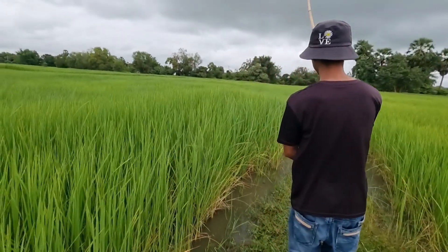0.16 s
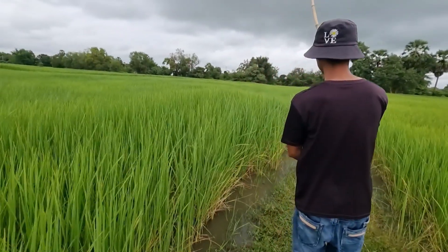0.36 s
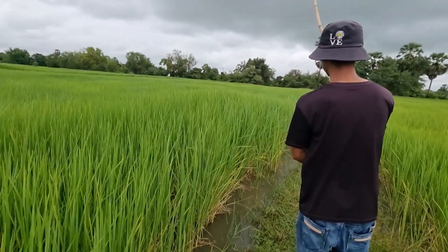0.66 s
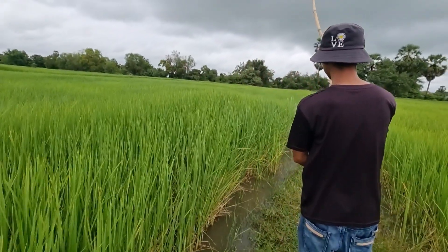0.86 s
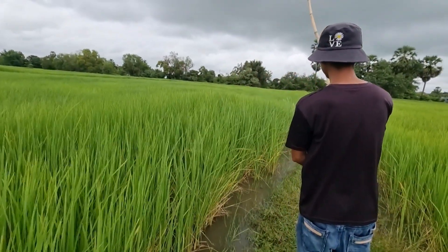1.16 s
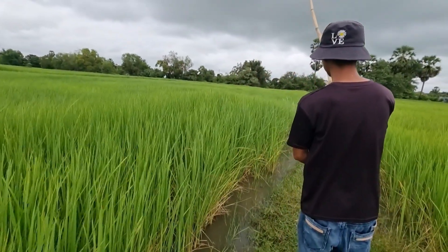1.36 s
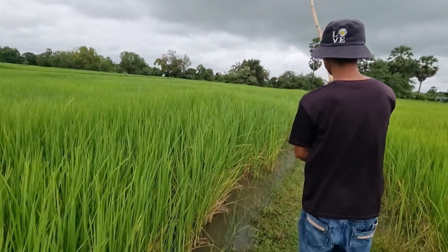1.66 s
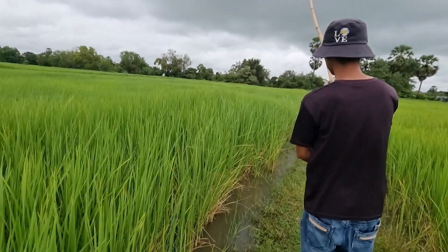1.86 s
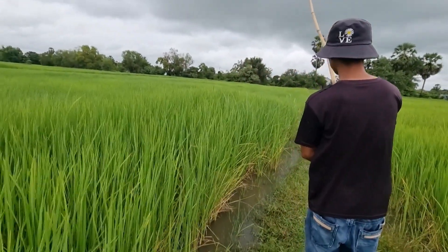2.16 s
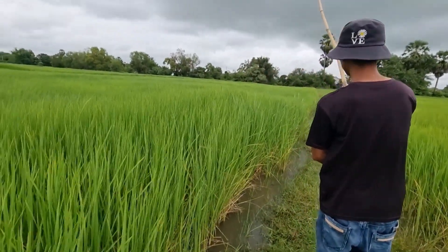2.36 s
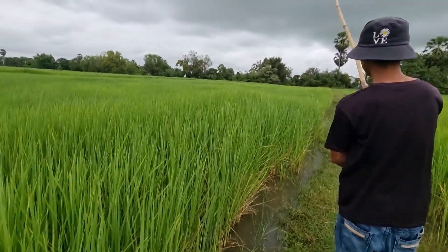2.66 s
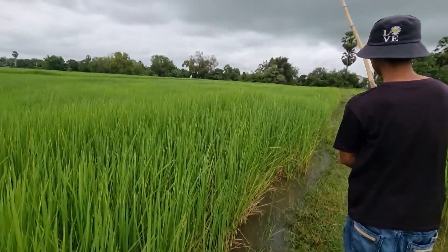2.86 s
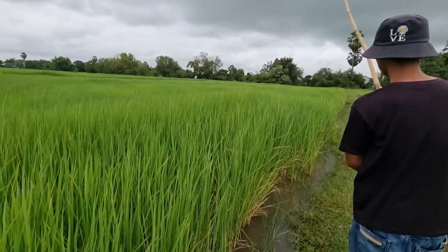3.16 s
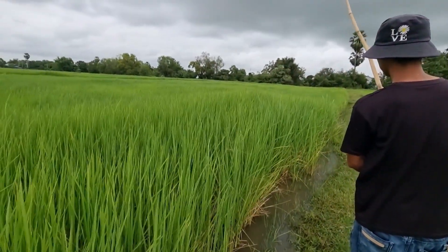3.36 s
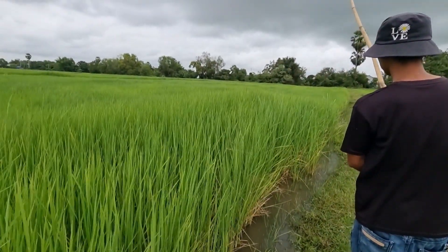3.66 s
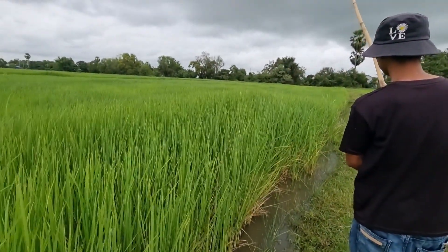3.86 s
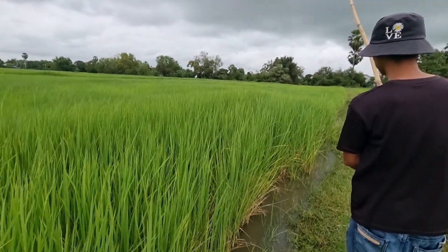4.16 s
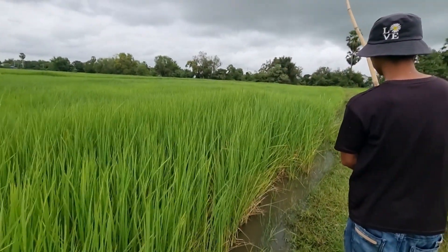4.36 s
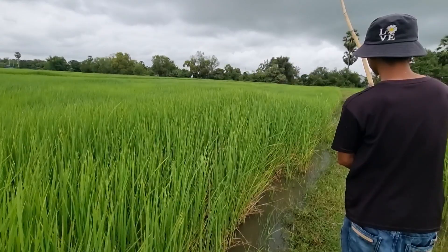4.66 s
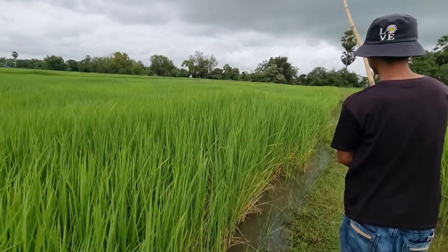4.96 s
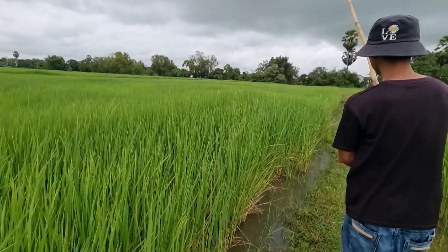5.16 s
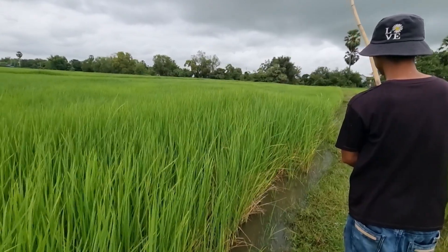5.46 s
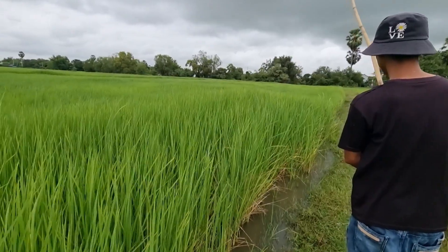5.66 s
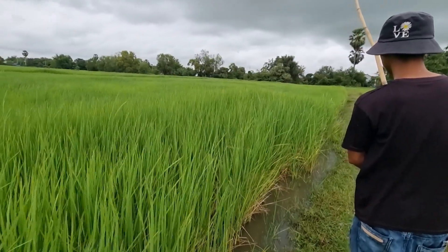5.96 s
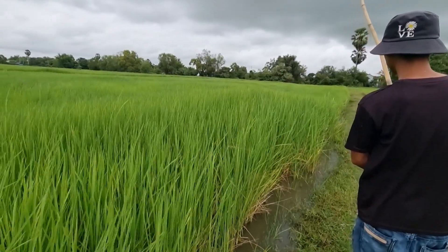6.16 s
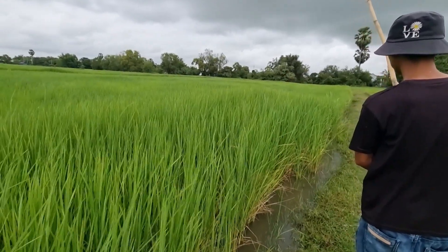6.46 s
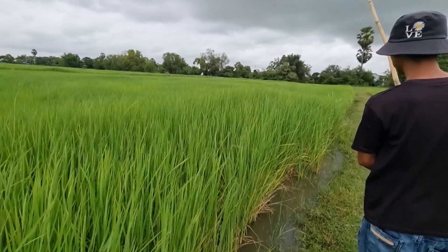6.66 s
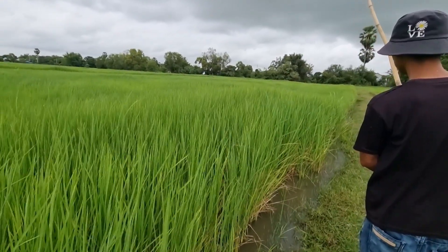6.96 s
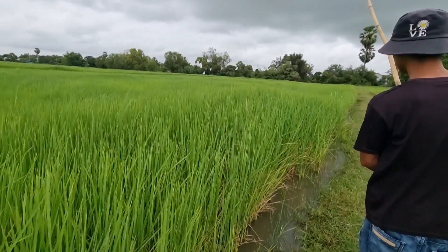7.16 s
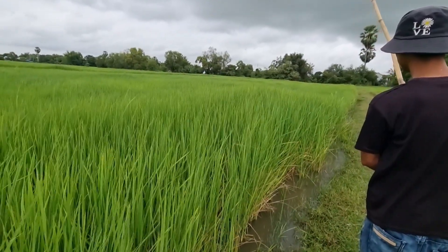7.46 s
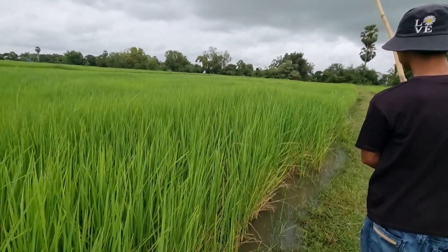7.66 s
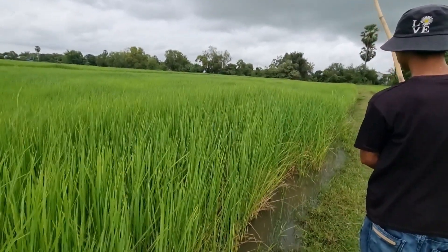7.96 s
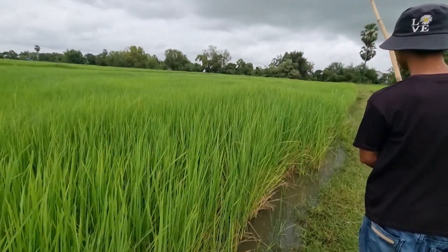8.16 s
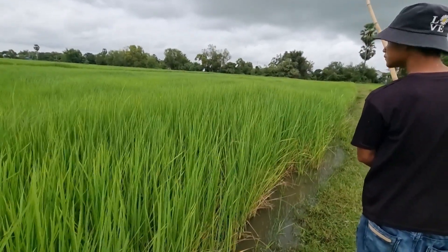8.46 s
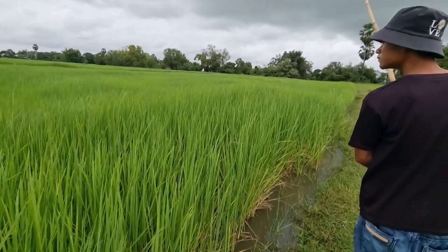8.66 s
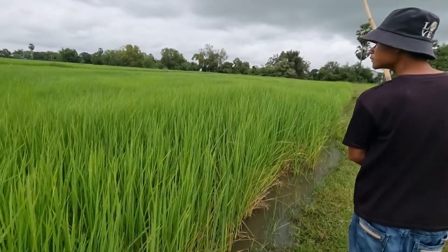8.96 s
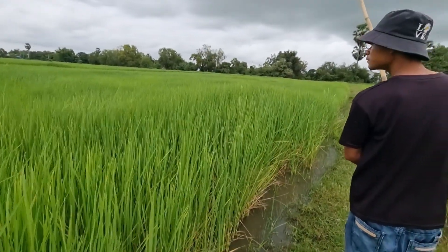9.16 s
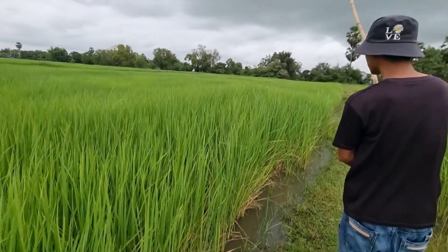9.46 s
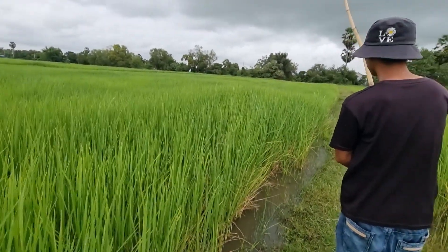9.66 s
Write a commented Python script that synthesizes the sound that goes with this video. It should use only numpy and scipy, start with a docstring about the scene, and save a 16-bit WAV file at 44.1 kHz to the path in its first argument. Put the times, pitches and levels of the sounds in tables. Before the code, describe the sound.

Gusty wind rumbles and thumps on the microphone in an open field, with faint bird peeps, whistles and high insect chirping.

```python
"""Wind over a rice field

A low roar reaches both microphone ports, gusts buffet and thump each on its own, and blades rustle.
Katydids chirp with ringing wing strokes, a near one and then a fainter, farther one, above a far insect
chorus and a throbbing cricket. Small birds peep and whistle, and a frog croaks once through its resonant
throat. Faint calls, a rooster-like crow and an engine-like hum drift in from far away."""
import sys
import numpy as np
from scipy import signal
from scipy.fft import rfft, irfft, next_fast_len
from scipy.io import wavfile

SR = 44100
rng = np.random.default_rng(int(sys.argv[2]) if len(sys.argv) > 2 else 0)


def log_audio(samples):
    """Write samples as a 16-bit WAV file to the path given in sys.argv[1]."""
    # one column per channel
    frames = np.atleast_2d(samples).T
    # limit to full scale, then quantise
    limited = np.clip(frames, -1, 1)
    pcm = np.round(limited * 32767).astype(np.int16)
    wavfile.write(sys.argv[1], SR, pcm)


N = 433503

# the wind bed under the thumps: time_s, level_db
WIND_LEVEL = [(0.0, -47.5), (0.38, -43.5), (1.15, -47.5), (1.61, -44), (2.3, -47), (2.76, -46.5),
              (3.01, -48), (6.46, -49), (6.81, -48.5), (7.01, -50.5), (7.45, -46), (7.94, -51),
              (8.38, -46.5), (8.9, -49.5), (9.39, -47.5), (9.83, -48.5)]
# eddies bursting on a port: time_s, level_db, pan_db (left minus right), width_ms, relative_snap_db
THUMPS = [(0.263, -29.5, -9, 3.4, -35), (0.811, -28.5, -12, 1.56, -19), (0.845, -32, -17.5, 1.33, -11.5),
          (0.97, -45, 6, 1.8, -2), (1.003, -40.5, -21, 1.6, -1.5), (1.188, -24.5, -9.5, 2.8, -11),
          (1.228, -42.5, -20, 1.86, 4), (1.264, -28.5, -10.5, 3, -11), (1.384, -27, -5.5, 2.1, -22),
          (1.483, -25, -12.5, 1.62, -31), (1.573, -26.5, -11.5, 1.34, -25), (1.648, -37.5, -14, 2.3, -5),
          (1.781, -31, -1, 3.2, -22), (4.345, -36.5, -13, 1.9, -44), (4.763, -28, -10, 1.9, -27),
          (4.82, -33.5, -15, 1.28, -17), (6.584, -39, -9, 3.3, 9), (6.631, -29, 4, 2.9, -28),
          (6.708, -25.5, -13.5, 2.8, -16), (6.734, -32, -11, 2.2, -10), (6.828, -28.5, 4, 2.4, -10),
          (6.851, -26, -8.5, 2, -14), (6.978, -30.5, 2.5, 3.3, -23), (7.191, -32, -16.5, 1.66, -19),
          (7.29, -38.5, 21, 1.65, -27), (7.363, -37.5, 18, 1.9, -22), (8.155, -32.5, -5, 1.8, -35)]
# tone of the distant roar: frequency_hz, gain_db
ROAR_SPECTRUM = [(13, -37), (22, -14), (35, -23), (48, 0), (64, 0.5), (96, -5), (134, -3), (182, -11.5),
                 (221, -15), (258, -22.5), (480, -44), (620, -48), (1060, -120)]
# tone of the buffeting on the ports: frequency_hz, gain_db
BUFFET_SPECTRUM = [(13, -50), (22, -5), (64, 3.5), (118, -2.5), (203, -12), (255, -21), (300, -27),
                   (450, -45), (580, -68), (990, -120)]
# tone of rustling blades and far hiss: frequency_hz, gain_db
RUSTLE_SPECTRUM = [(250, -80), (380, -16), (480, -9.5), (700, 0), (910, -1), (2000, -8), (3300, -3),
                   (4300, -1.5), (5000, -7.5), (5800, -11.5), (7000, -8.5), (8200, -11), (10500, -11),
                   (14500, -11.5), (15400, -14)]
# rise and fall of the rustle: time_s, level_db
RUSTLE_LEVEL = [(0.0, -65), (1.04, -67.5), (3.7, -69), (5.34, -67.5), (8.16, -67.5), (8.38, -65.5),
                (9.25, -69), (9.83, -68)]
# lean of the rustle: frequency_hz, pan_db
RUSTLE_PAN = [(400, 10.5), (1000, -0.5), (3000, 6.5), (12000, 5.5)]
# rustle common to both ports: frequency_hz, power_share
RUSTLE_COMMON = [(400, 1), (1200, 0.22), (3000, 0.042), (12000, 0.0099)]
# dry ticks of blades: start_s, level_db
BLADE_TICKS = [(0.4524, -50), (4.2423, -55), (4.6144, -67), (5.8494, -66), (6.4794, -55)]
# katydid chirping, a near one until 6.7 s, then a fainter, farther one:
# time_s, level_db, strokes_per_s, behind_beat_s
KATYDID_CHIRPING = [(0, -82.5, 142, -0.035), (.84, -79.5, 143, -0.033), (1.96, -73.5, 141, -0.053),
                    (3.08, -69, 141, -0.084), (4.76, -69, 137, -0.08), (5.32, -68, 135, -0.094),
                    (5.88, -68, 133, -0.074), (6.44, -67.5, 135, -0.065), (6.71, -73.5, 135, -0.025),
                    (6.74, -82.5, 135, -0.049), (7.6, -80, 136, -0.11), (8.4, -77, 138, -0.085),
                    (9.83, -76.5, 142, -0.093)]
# falling peeps: start_s, length_s, end_hz, level_db
PEEPS = [(0.026, 0.041, 4250, -58.5), (0.323, 0.052, 4610, -57.5), (0.58, 0.077, 4620, -57),
         (0.832, 0.054, 4740, -60.5), (1.103, 0.061, 4660, -60.5), (1.385, 0.043, 4650, -60.5),
         (1.663, 0.031, 4620, -62.5), (1.894, 0.059, 4550, -64), (2.124, 0.066, 4510, -64),
         (2.351, 0.048, 4500, -63), (2.601, 0.042, 4540, -61), (2.839, 0.046, 4300, -61),
         (3.053, 0.059, 4550, -66.5), (4.791, 0.051, 4700, -62), (5.018, 0.043, 4700, -72)]
# quick faint chips: start_s, length_s, start_hz, end_hz, start_db
CHIPS = [(2.98, .025, 3750, 3200, -77), (3.475, 0.03, 4770, 3230, -76), (4.398, 0.016, 5160, 4520, -78),
         (4.612, 0.015, 5340, 3160, -73), (5.84, 0.028, 3700, 2350, -83), (8.12, 0.019, 4130, 5000, -77),
         (8.15, 0.037, 4280, 3300, -81), (8.45, 0.029, 2460, 2250, -85), (8.61, 0.027, 2530, 2270, -81.5),
         (8.292, 0.013, 5260, 4340, -71.5), (9.448, 0.017, 4260, 5040, -73), (9.475, 0.04, 4830, 2940, -80)]
# high rising whistles: start_s, length_s, top_hz, level_db
HIGH_WHISTLES = [(3.672, 0.13, 7210, -54.5), (6.379, 0.14, 7180, -60.5), (8.982, 0.13, 7290, -52.5)]
# contour of a high whistle: length_share, pitch_share, gain_db
HIGH_SHAPE = [(0, .84, -17), (.14, .895, 1), (.27, .92, 1), (.5, 0.94, -0.5), (.68, .98, -2.5), (.88, 1, 2),
              (1, 1, -6)]
# lower whistles, a hook then a held note: start_s, length_s, top_hz, hook_db, held_db
LOW_WHISTLES = [(2.281, 0.13, 6030, -72, -58.5), (5.188, 0.15, 6060, -62, -57),
                (7.675, 0.14, 6030, -60.5, -56)]
# contour of a lower whistle: length_share, pitch_share, gain_db, in_hook (1 or 0)
LOW_SHAPE = [(0, .86, -12, 1), (.14, .82, 0, 1), (.27, .925, -3, 1), (.37, .95, -17, 1), (.5, .97, -10, 0),
             (.66, .99, -3, 0), (.8, 1, 0, 0), (.9, .99, -4, 0), (1, .98, -22, 0)]
# the frog's throat pulses: time_s, pulses_per_s
CROAK_RATE = [(3.51, 138.8), (3.6, 133.8), (3.68, 137.3), (3.78, 134.4), (3.85, 135.4), (3.96, 134)]
# far hum: time_s, level_db
HUM_LEVEL = [(0, -66.5), (2, -55.5), (4.5, -51), (6, -59), (8, -58.5), (9, -55.5), (9.83, -48.5)]
# main band of the insect chorus: time_s, level_db
CHORUS_LEVEL = [(0.0, -79), (2.14, -80), (3.56, -77.5), (4.5, -79.5), (6.43, -75.5), (7.34, -80),
                (9.83, -77.5)]
# a cricket's short spell: time_s, level_db
CRICKET_LEVEL = [(5.5, -85), (5.75, -79), (6.3, -75), (6.7, -83), (7.0, -96)]
# far soft calls: start_s, length_s, start_hz, end_hz, start_db
FAR_CALLS = [(.61, 0.06, 6020, 6070, -75), (5.53, 0.056, 6400, 6430, -79),
             (7.485, 0.071, 6280, 6450, -82.5), (1.22, 0.094, 2126, 2140, -78),
             (7.25, .085, 4070, 4050, -80), (1.62, 0.046, 1230, 1145, -77.5),
             (1.66, 0.31, 2090, 1910, -84.5), (2.23, 0.078, 1750, 1770, -85), (5.8, 0.17, 880, 870, -88),
             (7.05, 0.18, 713, 694, -84), (7.45, 0.28, 890, 845, -86)]
# a far rooster-like crow that droops at its end: time_s, pitch_hz, level_db
CROW = [(5.8, 1467, -88), (6.1, 1452, -79.5), (6.4, 1440, -90), (6.52, 1405, -75), (6.6, 1350, -82)]
# a faint band of noise that comes and goes: time_s, level_db
DRONE_LEVEL = [(0, -83), (4.8, -90), (5.3, -80), (6.5, -81.5), (7.2, -74), (8.5, -88), (9, -87),
               (9.83, -82)]

# how late the left port hears each source
LAG_SAMPLES = dict(wind=17, katydid=-9, chorus=20, peeps=16, whistles=7, far=9, frog=15)
SIDES = np.array([[.5], [-.5]])   # splits a pan between left and right


def wind(takeover_db=-44.5, crossfade_db=2.5, big_eddy_hz=118.5, swell_s=.028, swell_under_db=13.5):
    """A far roar, alike on both ports; in gusts lumpy eddies take over, the small ones separate per port."""
    level_db, = in_time(WIND_LEVEL)
    t = np.arange(N) / SR
    gusty = 1 / (1 + np.exp((takeover_db - level_db) / crossfade_db))
    roar = colour(rng.standard_normal(N), ROAR_SPECTRUM) * from_db(.83 * drift(19.5) + 1.1 * drift(4.2))
    roar = place(roar, 1.5, "wind")
    lumps = from_db(3.5 * np.array([drift(22), drift(22)]))
    shared, *own = colour(rng.standard_normal((3, N)), BUFFET_SPECTRUM)
    small = filtered(np.array(own) - shared, big_eddy_hz, "high")   # slower eddies cover both ports
    eddies = rms_one(lumps * (shared + small + .55 * np.array(own)))
    power = gusty * from_db(2 * level_db) * np.ones((2, 1))
    for s, thump_db, pan_db, *_ in THUMPS:   # each thump rides on a short swell of buffeting
        i = slice(round((s - .2) * SR), round((s + .2) * SR))
        swell_db = thump_db - swell_under_db + pan_db * SIDES
        power[:, i] += np.exp(-((t[i] - s) / swell_s) ** 2) * from_db(2 * swell_db)
    return np.sqrt(1 - gusty) * from_db(level_db) * roar + np.sqrt(power) * eddies


def thumps(vent_hz=48):
    """A bursting eddy pushes the membrane out and back in milliseconds, with a sharper snap on top."""
    out, t = np.zeros((2, N)), np.arange(-400, 800) / SR
    for (s, level_db, pan_db, width_ms, snap_db), sign in zip(THUMPS, rng.choice([-1, 1], len(THUMPS))):
        widths = 1000 * t / width_ms
        push = widths * np.exp(-widths ** 2 / 2)
        snap = from_db(snap_db) * np.exp(-(2.7 * widths) ** 2 / 2)
        i = round(s * SR) - 200
        out[:, i:i + len(t)] += sign * (push + snap) * from_db(level_db + pan_db * SIDES)
    return filtered(out, vent_hz, "high")   # the capsule vents the slowest pressure


def rustle():
    """Blades hiss, partly alike on both ports; the low bands flicker, the treble stays smoother."""
    out, together = 0, drift(10.3)
    edges_hz = 340 * 2 ** np.arange(0, 5.8, .4)
    white = rng.standard_normal((2, 3, N))
    for k, (low, high) in enumerate(zip(edges_hz, edges_hz[1:])):
        common, *own = filtered(white[k % 2], [low, high])   # neighbouring bands get separate noise
        hz = np.sqrt(low * high)
        alike = np.clip(at_hz(RUSTLE_COMMON, hz), 0, 1)
        band = np.sqrt(alike) * place(common, 0, "wind") + np.sqrt(1 - alike) * np.array(own)
        flicker_db = (.6 * together + 1.6 * drift(9)) * min(1, 1500 / hz) ** .6
        out = out + band * from_db(at_hz(RUSTLE_PAN, hz) * SIDES + flicker_db)
    return colour(out, RUSTLE_SPECTRUM) * from_db(in_time(RUSTLE_LEVEL)[0])


def blade_ticks(t60_s=.022):
    """Each dry tick of a blade is a short puff of bright noise."""
    out, t = np.zeros(N), np.arange(800) / SR
    for s, db in BLADE_TICKS:
        i = round(s * SR)
        out[i:i + len(t)] += from_db(db - 60 * t / t60_s) * rng.standard_normal(len(t))
    return place(filtered(out, [1600, 7000]), 9.4, "peeps")


def katydids(chirps_per_s=8.93, ring_hz=9310, full_db=-68.5, hz_per_db=25.5, stroke_s=.0022):
    """A near katydid, then a farther one: wing strokes ring in swelling chirps, blurred by the grass."""
    level_db, strokes_per_s, behind_s = in_time(KATYDID_CHIRPING)
    cycle = (chirps_per_s * (np.arange(N) / SR - behind_s) + .46) % 1
    gate = np.clip(np.minimum(cycle / .07, (.8 - cycle) / .06), .03, 1)
    chirp = gate * (.7 + .4 * cycle)
    scrape = pulses(strokes_per_s, jitter=.01, uneven_db=1.2) + .012 * rng.standard_normal(N)
    # the wing rings higher the harder it is driven
    wing_hz = (ring_hz + hz_per_db * (level_db - full_db)) * (1 + .008 * drift(30))
    near = resonate(scrape * chirp, wing_hz + 130, width_hz=440)
    stroke_ends = np.roll(scrape, round(stroke_s * SR))   # each stroke ends on a lower mode
    near += .95 * resonate(stroke_ends * chirp, wing_hz - 260, width_hz=445)
    blur = resonate(rng.standard_normal((2, N)) * chirp, wing_hz, width_hz=750)
    wing = place(rms_one(near), 8.5, "katydid") + .5 * rms_one(blur) * from_db(8 * SIDES)
    wing = filtered(wing, [8500, 10500], order=3)   # the wing radiates this band best
    upper_mode = resonate(rng.standard_normal((2, N)) * chirp, 10800, width_hz=2700)
    rasp = rms_one(upper_mode) * from_db(-13 + 6 * SIDES)
    return from_db(level_db + .7 * drift(6)) * (wing + rasp)


def peep(s, length_s, end_hz, db, rough, top_hz=5750, knee_hz=5030, drop_s=.00887):
    """A bird's peep: a faint steep drop to a knee, a slower fall, then a short hoarse tail."""
    knee, end = s + drop_s, s + length_s
    middle = ((knee + end) / 2, .42 * knee_hz + .58 * end_hz, db)
    body = [(s, top_hz, db - 21), (knee, knee_hz, db - 1.5), middle, (end, end_hz, db - 5)]
    tail = [(end - .006, end_hz, db - 10), (end + .016, .95 * end_hz, db - 16)]
    return sing(body, rough) + sing(tail, 9 * rough)


def bird_whistles(shake):
    """High rising calls and lower hooked ones, each a contour stretched to its length and pitch."""
    paths = []
    for s, length_s, top_hz, db in HIGH_WHISTLES:
        paths.append([(s + at * length_s, pitch * top_hz, db + gain) for at, pitch, gain in HIGH_SHAPE])
    for s, length_s, top_hz, hook_db, held_db in LOW_WHISTLES:
        paths.append([(s + at * length_s, pitch * top_hz, gain + (hook_db if in_hook else held_db))
                      for at, pitch, gain, in_hook in LOW_SHAPE])
    return sum(sing(path, .28 * shake + .086 * drift(35)) for path in paths)


def frog(start_s=3.51, swell_s=.17, fade_s=.28, rest_hz=2305, lift_hz=120):
    """Overtones of the throat pulses sound where the throat resonates, less steady as the call tires."""
    t, marks = np.arange(N) / SR, np.cumsum([start_s, swell_s, fade_s])
    on = (t > marks[0]) & (t < marks[-1])
    per_s, = in_time(CROAK_RATE)
    throat_hz = rest_hz + lift_hz * np.interp(t, marks, [0, 1, 0])   # highest at the loudest
    level_db = np.interp(t, marks, [-69, -59.5, -74])
    unsteady = np.interp(t, marks, [.2, .2, .55])
    phase = 2 * np.pi * np.cumsum(per_s * (1 + .0042 * drift(40))) / SR
    croak = 0
    for k in range(14, 22):
        throat = np.exp(-((k * per_s - throat_hz) / 260) ** 2)
        waver = 1 + unsteady * drift(30)
        overtone = np.cos(k * phase[on] + .5 * k * k)   # high overtones lead in each pulse
        croak = croak + throat[on] * waver[on] * overtone
    out = np.zeros(N)
    out[on] = from_db(level_db[on]) * rms_one(croak)
    return out


def hum(pitch_hz=132):
    """A far engine-like hum inside the roar: a wandering tone in a narrow band of noise."""
    hz = pitch_hz * (1 + .04 * drift(.5) + .02947 * drift(4.92))
    tone = np.sqrt(2) * np.sin(2 * np.pi * np.cumsum(hz) / SR)
    band = rms_one(tone + .6 * noise_band(hz, width_hz=25))
    return place(band * from_db(in_time(HUM_LEVEL)[0]), 2.2, "wind")


def insect_chorus():
    """Many far insects merge into a flickering band, with a faint steady one above it."""
    band = resonate(rng.standard_normal((3, N)), 7460, width_hz=510) * from_db(1.03 * drift(30))
    band = rms_one(filtered(band, [6950, 7900]))
    low = from_db(in_time(CHORUS_LEVEL)[0]) * (place(band[0], 8.5, "chorus") + 1.03 * band[1:])
    high = rms_one(filtered(rng.standard_normal((2, N)), [8700, 9700]))
    return low + high * from_db(-81 + 8 * SIDES)


def cricket(buzzes_per_s=12.2):
    """A cricket throbs in short buzzes near the chorus pitch."""
    throb = np.clip(1.5 * np.cos(2 * np.pi * buzzes_per_s * np.arange(N) / SR + .89), 0, 1)
    buzz = rms_one(throb * noise_band(7050, width_hz=320))
    return place(buzz * from_db(in_time(CRICKET_LEVEL)[0]), 1.3, "chorus")


def gliding_calls(notes, rough, swell_db=4.5):
    """Short faint notes that swell a little while gliding between two pitches."""
    return sum(sing([(s, start_hz, db), (s + length_s, end_hz, db + swell_db)], rough)
               for s, length_s, start_hz, end_hz, db in notes)


def drone(pitch_hz=702, swish_at_s=2.68, swish_half_s=.18, swish_db=-66):
    """Noise in a narrow resonance comes and goes, with one brief hollow swish above it."""
    band = noise_band(pitch_hz * (1 + .03 * drift(3)), width_hz=80)
    swell = np.exp(-((np.arange(N) / SR - swish_at_s) / swish_half_s) ** 2)
    swish = noise_band(1090, width_hz=230) * from_db(swish_db) * swell
    return place(band * from_db(in_time(DRONE_LEVEL)[0] + 3.9 * drift(10)) + swish, 2.5, "wind")


def field_echo(x, t60_s):
    """Scattered returns from the crop and the tree line, different at each port."""
    t = np.arange(int(.4 * SR)) / SR
    tail = rng.standard_normal((2, len(t))) * from_db(-60 * t / t60_s) * (t > .012)
    return signal.fftconvolve(x[None], tail / np.sqrt(np.sum(tail ** 2) / 2), axes=1)[:, :N]


def sing(path, rough):
    """A pure tone along a (time_s, pitch_hz, level_db) path; the rough signal shakes its amplitude."""
    s, hz, level_db = np.transpose(path)
    i = np.arange(round(s[0] * SR), round(s[-1] * SR))
    tone = np.sin(2 * np.pi * np.cumsum(np.interp(i / SR, s, hz)) / SR)
    fade = np.clip(np.minimum(i - i[0], i[-1] - i) / 150, 0, 1)
    out = np.zeros(N)
    out[i] = np.sqrt(2) * fade * tone * (1 + rough[i]) * from_db(np.interp(i / SR, s, level_db))
    return out


def pulses(per_s, jitter, uneven_db):
    """One click per stroke, a little uneven in time and strength."""
    count = np.floor(np.cumsum(per_s * (1 + jitter * drift(34))) / SR)
    return np.diff(count, prepend=0) * from_db(uneven_db * rng.standard_normal(N))


def resonate(x, hz, width_hz):
    """Pulses or noise, smoothed twice, set the strength of a ring whose pitch may move."""
    turn = np.exp(2j * np.pi * np.cumsum(np.broadcast_to(hz, N)) / SR)
    r = np.exp(-np.pi * width_hz / SR)
    return np.real(turn * signal.lfilter([1], [1, -2 * r, r * r], x + 1e-18))


def noise_band(hz, width_hz):
    """Narrow noise around a pitch; rms 1."""
    return rms_one(resonate(rng.standard_normal(N), hz, width_hz))


def drift(rate_hz):
    """A smooth random wobble of spread 1, mostly slower than rate_hz."""
    r = np.exp(-80 * np.pi * rate_hz / SR)   # one step every 40 samples
    slow = signal.lfilter([1], [1, -2 * r, r * r], rng.standard_normal(N // 40 + 2002))[2000:]
    return np.interp(np.arange(N) / 40, np.arange(len(slow)), rms_one(slow))


def colour(x, spectrum):
    """Shape noise by a spectrum; rms 1."""
    size = next_fast_len(N)
    hz = np.maximum(np.arange(size // 2 + 1) * SR / size, 1)
    return rms_one(irfft(rfft(x, size) * from_db(at_hz(spectrum, hz)), size)[..., :N])


def filtered(x, hz, kind="band", order=2):
    """A gentle filter, band-pass by default."""
    return signal.sosfilt(signal.butter(order, hz, kind, fs=SR, output="sos"), x)


def place(x, pan_db, lag_of):
    """Pan across two spaced ports, the left one shifted by the named source's lag."""
    return np.array([np.roll(x, LAG_SAMPLES[lag_of]), x]) * from_db(pan_db * SIDES)


def in_time(rows):
    """Table columns as curves over all samples."""
    s, *columns = np.transpose(rows)
    return [np.interp(np.arange(N) / SR, s, c) for c in columns]


def at_hz(points, hz):
    """Read a curve on a log-frequency axis."""
    points_hz, values = np.transpose(points)
    return np.interp(np.log(hz), np.log(points_hz), values)


def from_db(db):
    """Decibels to gain."""
    return 10 ** (np.asarray(db) / 20)


def rms_one(x):
    """Scale to unit rms."""
    return x / np.sqrt(np.mean(x ** 2) + 1e-20)


def scene():
    """Wind up front on the ports; insects, birds and a frog out in the field."""
    shake = drift(130)
    peeps = sum(peep(*row, rough=.4 * shake) for row in PEEPS)
    peeps += gliding_calls(CHIPS, rough=2.5 * drift(450))
    whistles = bird_whistles(shake)
    far = gliding_calls(FAR_CALLS, rough=.7 * drift(50)) + sing(CROW, rough=.35 * drift(12))
    croak = frog()
    callers = (place(peeps, 9.3, "peeps") + place(whistles, 5.1, "whistles")
               + place(far, 13.8, "far") + place(croak, 6.3, "frog"))
    echo = from_db(-8.5) * field_echo(peeps, t60_s=.19)
    echo += from_db(-13.5) * field_echo(whistles + croak, t60_s=.55)
    bed = wind() + hum() + thumps() + rustle() + drone()
    insects = katydids() + insect_chorus() + cricket()
    return bed + insects + blade_ticks() + callers + echo


def record(dry):
    """A steep low-pass takes off the very top."""
    cutoff_hz = 15540
    return signal.sosfilt(signal.ellip(12, .5, 70, cutoff_hz, fs=SR, output="sos"), dry)


dry = scene()
out = record(dry)
log_audio(out)
```